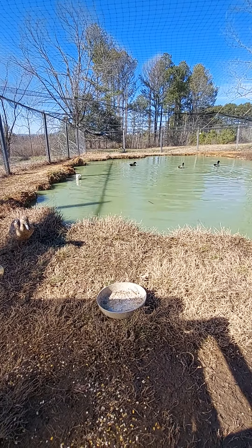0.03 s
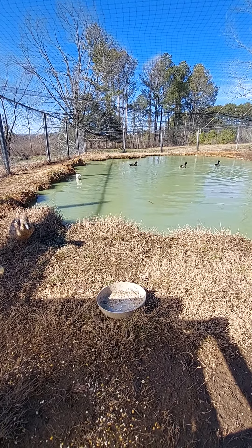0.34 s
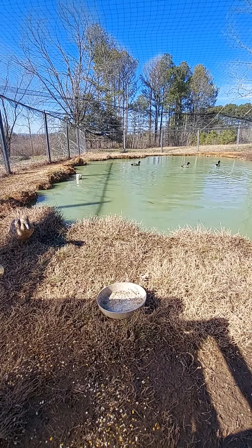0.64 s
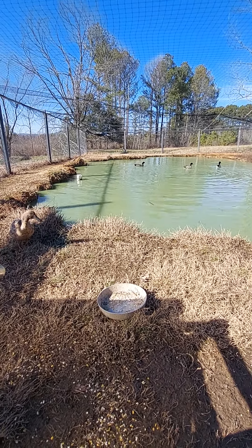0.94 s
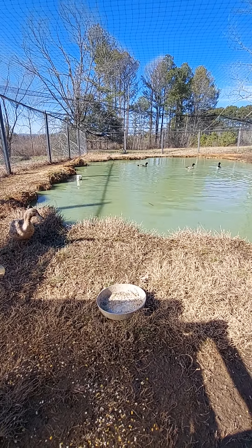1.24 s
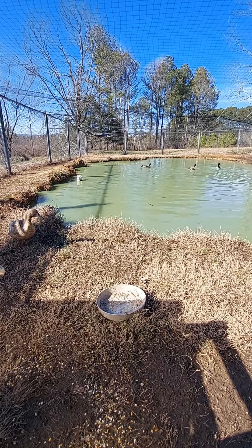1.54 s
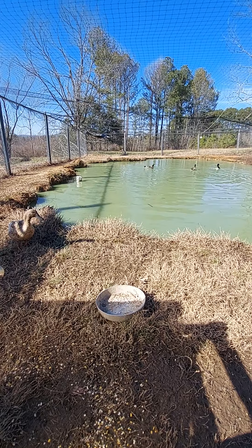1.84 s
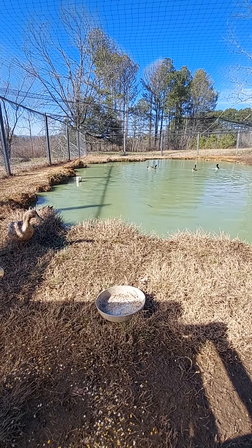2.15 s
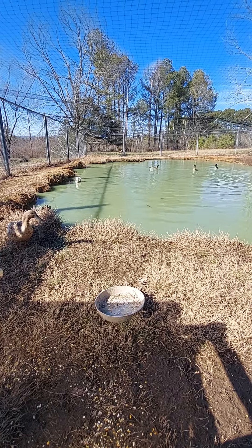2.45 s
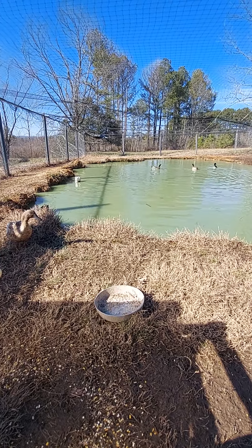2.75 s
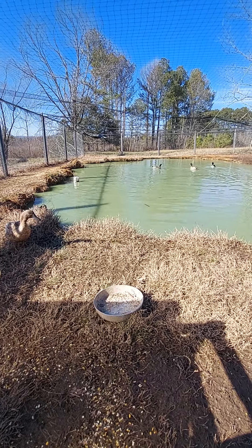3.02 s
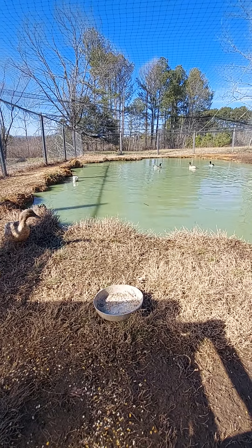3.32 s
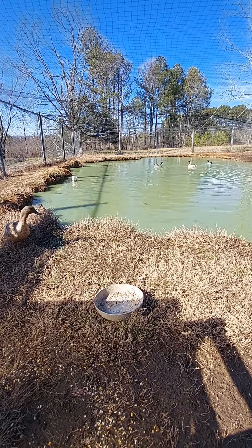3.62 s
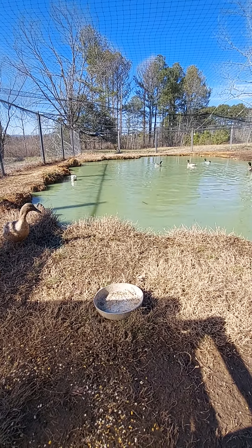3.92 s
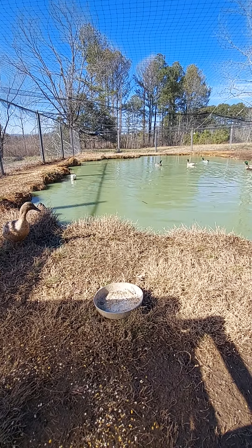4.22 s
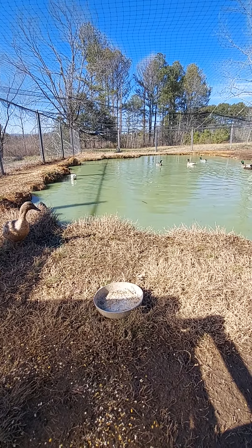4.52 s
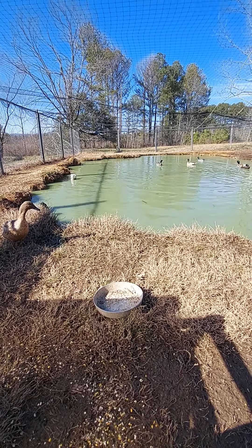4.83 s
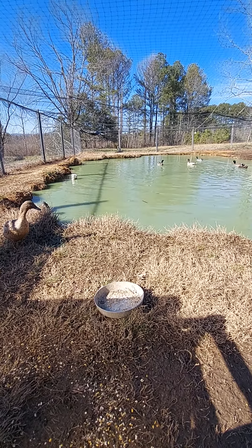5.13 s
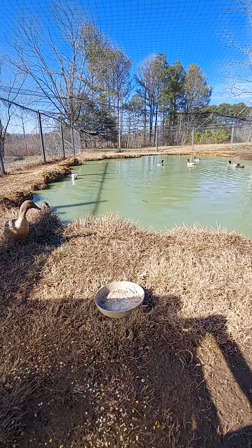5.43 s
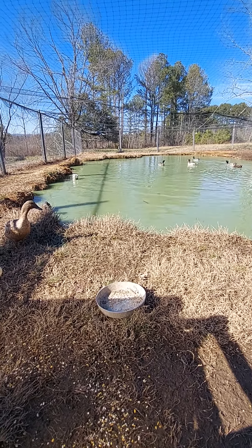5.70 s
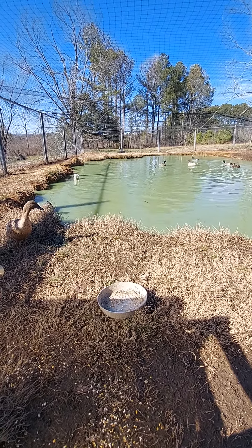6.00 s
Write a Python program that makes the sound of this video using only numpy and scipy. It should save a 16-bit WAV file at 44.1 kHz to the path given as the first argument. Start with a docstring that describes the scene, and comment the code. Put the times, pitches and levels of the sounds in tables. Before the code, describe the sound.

A duck quacks outdoors by a backyard pond. Its six loud, rasping calls peak at about 0.9, 1.8, 2.7, 3.5, 4.2 and 5.1 seconds, each swelling for a third of a second and dropping away quickly, the later ones raspier. Softer grumbles fall between them, from 0.3 seconds until the end at 6 seconds. The calls have a short, slight echo from nearby surfaces. Underneath, distant engines make a low, throbbing hum, strongest in the first few seconds and then gradually weaker, mixed with a low outdoor rumble and faint hiss. Dry grass crackles lightly close by during the first two seconds and again around 4 to 5 seconds. A far bird calls briefly at 1 second. A distant dog barks about five times between 3.2 and 4.1 seconds, and a very faint, thin whistle follows at 4.5 seconds.

```python
"""Backyard pond. A duck gives six loud, rasping quacks with softer grumbles in between.
Each call is one push of air: beating membranes ring the throat and, pushed hard, the open bill.
Two far engines hum and beat against each other over outdoor air; dry grass crackles close by.
A far bird calls, a far dog barks a few times, a thin whistle follows. The ground and nearby
surfaces throw the calls back; the two microphone ports colour them differently."""
import sys
import numpy as np
from scipy import signal
from scipy.fft import rfft, irfft, next_fast_len
from scipy.io import wavfile
from scipy.ndimage import uniform_filter1d

SR = 44100
rng = np.random.default_rng(int(sys.argv[2]) if len(sys.argv) > 2 else 0)


def dump_mix(stems):
    """Bounce the given channels to the path in sys.argv[1] as a 16-bit WAV at rate SR."""
    frames = np.atleast_2d(stems).T  # one column per channel
    limited = np.clip(frames, -1, 1)  # hard clip at full scale
    pcm = np.round(limited * 32767).astype(np.int16)
    wavfile.write(sys.argv[1], SR, pcm)


N = 271634
TIME = np.arange(N) / SR

# Both engines together: time_s, level_db
HUM_LEVEL = [(0.1, -36.5), (0.35, -36.7), (0.8, -33), (1.3, -37.5), (1.6, -35.5), (1.9, -51), (2.2, -38),
             (2.5, -38), (2.9, -42.5), (3.3, -39), (3.6, -43.5), (3.9, -43.5), (4.3, -42), (4.7, -45),
             (5.1, -44), (5.45, -52.5), (5.7, -44), (6.0, -66)]
# First engine's harmonics: multiple, gain_db
HUM_HARMONICS = [(1, 1.5), (2, -21.5), (3, -28)]
# Second engine against the first: time_s, relative_db
SECOND_ENGINE = [(1.2, -24), (2.1, 3), (3.3, -6.5), (6.0, -8)]
# Air spectra: freq_hz, density_db
RUMBLE_SPECTRUM = [(20, -41), (35, -41), (55, 1), (90, 1.5), (130, 6.5), (170, -5), (205, -6.5), (235, -4),
                   (300, -14), (400, -23), (700, -28.5), (2000, -59)]
HISS_SPECTRUM = [(250, -22), (450, -2.5), (750, 5), (1250, 4), (1900, -6.5), (3000, -5), (3900, 1.5),
                 (5000, 1), (6800, -4), (8600, -1), (10000, -9.5), (13000, -6), (15600, -12.5)]
# Hiss swells: centre_s, rise_db, length_s
AIR_SWELLS = [(0.84, 5, 0.45), (3.307, 2.5, 0.27), (4.957, 7, 0.6)]
# Left-right likeness of the air: freq_hz, correlation
AIR_COHERENCE = [(60, 0.95), (130, 0.98), (290, 0.72), (640, 0.62), (1400, 0.034), (3000, 0), (15000, 0)]
# Air balance: freq_hz, lean_db (left minus right)
AIR_LEAN = [(60, 1.5), (200, -3), (700, 0), (1500, -3), (2500, 3.5), (4400, -4.5), (8000, -2),
            (15000, -5.5)]
# Grass rustles: centre_s, level_db, length_s, treble_db
GRASS_RUSTLES = [(0.037, -51.5, 0.011, -7), (0.258, -58, 0.029, 0), (0.527, -55, 0.043, -8),
                 (1.106, -67, 0.073, 7), (1.395, -64.5, 0.039, 9.5), (1.461, -63, .012, 4),
                 (1.595, -60.5, 0.069, 5.5), (1.879, -53.5, 0.097, 1.5), (3.999, -61.5, .25, -2),
                 (4.757, -58.5, 0.19, 4.5), (4.946, -57.5, .36, -2)]
# Crackle spectrum: freq_hz, gain_db
GRASS_SPECTRUM = [(1500, 3.5), (4000, -3.5), (6500, -1), (8500, 0.5), (10000, -7.5), (12500, 2.5),
                  (15500, -6.5)]
# Soft calls: start_s, rise_s, fall_s, peak_db, swell_db, peak_rate_hz, throat_hz, opening_db
SOFT_CALLS = [ (0.249, 0.2, 0.16, -50.5, 11.5, 85, 1440, -3.5),
              (1.04, 0.26, 0.12, -50.5, 8.5, 111, 1440, -3.5), (1.87, 0.23, 0.08, -54.5, -2, 94, 1527, 1),
              (2.116, 0.049, 0.055, -53.5, 5.5, 64, 1380, -24),
              (2.72, 0.074, 0.12, -57, -5, 105, 1570, 2.5), (2.975, .17, .08, -53.5, 6, 67, 1340, -7.5),
              (3.786, .07, 0.055, -57.5, 3, 59, 1364, -12), (4.423, .065, .075, -56, 7, 47, 1224, -8),
              (5.463, 0.045, 0.073, -55.5, 10, 62, 1300, -14), (5.92, 0.098, 0.053, -56, 8, 53, 1260, -7)]
# Loud calls: start_s, rise_s, fall_s, peak_db, swell_db, peak_rate_hz, throat_hz, opening_db, rasp_db
LOUD_CALLS = [ (.565, 0.33, .12, -40.5, 7, 97.6, 1556, -2, -58),
              (1.495, 0.34, 0.15, -40, 6.5, 92, 1525, -3, -54),
              (2.35, 0.32, 0.13, -38.5, 10.5, 99, 1524, -3, -52.5),
              (3.115, .355, 0.14, -39, 10.5, 94.5, 1498, -3, -52),
              (3.945, .295, .115, -38.5, 9, 91, 1510, -4, -45.5),
              (4.835, 0.3, .1, -38, 8.5, 88.5, 1487, -4.5, -49)]
# Throat resonances: freq_hz, width_hz, gain_db, opening_share, db_per_rate_octave, lean_db, left_lead_rad
THROAT_MODES = [(1364, 213, -2, 0.067, -2, 0, 0.38), (1560, 173, 3, 0, 6.5, 2, 1),
                (1918, 180, 0.5, 0.65, 0, 0.5, -0.9), (2358, 180, -3, 1.63, 11, -5.5, 1)]
# Open-bill resonances: freq_hz, width_hz, gain_db, lean_db, left_lead_rad
BILL_MODES = [(2888, 640, 3.5, 4.5, 1.84), (3530, 180, -5, -13.5, 1.9), (4085, 120, -6.5, -8.5, 2.6),
              (4970, 270, -3.5, 7.5, 3.2), (5440, 107, -6, -8, .5), (6080, 470, -0.5, -1, 3.3)]
# Early echoes: delay_s, left_db, right_db
YARD_ECHOES = [(.0021, -63, -50), (.0037, -44, -33), (.0062, -44, -8.5), (0.0172, -18.5, -15.5),
               (0.0235, -9, -16.5)]
# Far bird call and thin whistle: time_s, pitch_hz, level_db
BIRD_GLIDE = [(.92, 1120, -68), (.96, 1040, -53), (1.0, 1010, -57), (1.03, 890, -56), (1.07, 1040, -59),
              (1.15, 1150, -64)]
WHISTLE_GLIDE = [(4.47, 1794, -67), (4.56, 1860, -71.5), (4.7, 1810, -79)]
# Far barks: peak_s, level_db, pitch_hz, length_s
DOG_BARKS = [(3.184, -54, 215.7, 0.1), (3.289, -45, 217.4, 0.11), (3.485, -47.5, 196.3, 0.099),
             (3.662, -49, 133, 0.077), (4.052, -48, 200, 0.072)]
# Dog's throat, from afar: freq_hz, gain_db
DOG_SPECTRUM = [(150, 6.5), (400, -2.5), (620, -0.5), (800, -6.5), (1020, 2), (1300, -12.5), (2500, -33.5)]


def gain_of(db):
    """Decibels to amplitude."""
    return 10 ** (np.asarray(db) / 20)


def unit_rms(x):
    """Scale to rms 1."""
    return x / np.sqrt(np.mean(abs(x) ** 2) + 1e-20)


def at_hz(table, hz):
    """Spectrum table, interpolated in log frequency."""
    freq_hz, value = np.transpose(table)
    return np.interp(np.log(hz + 1), np.log(freq_hz + 1), value)


def follow(table):
    """Curve table columns, per sample."""
    time_s, *columns = np.transpose(table)
    return [np.interp(TIME, time_s, column) for column in columns]


def colour(x, table):
    """Filter by a spectrum table."""
    size = next_fast_len(N)
    response = gain_of(at_hz(table, np.fft.rfftfreq(size, 1 / SR)))
    return irfft(rfft(x, size) * response, size)[..., :N]


def bandpass(x, low_hz, high_hz):
    """Butterworth band-pass."""
    return signal.sosfilt(signal.butter(6, [low_hz, high_hz], "band", fs=SR, output="sos"), x)


def drift(per_s):
    """Random wander, rms 1."""
    knots_s = np.arange(0, 7, 1 / per_s)
    return unit_rms(np.interp(TIME, knots_s, rng.standard_normal(len(knots_s))))


def resonate(x, hz, width_hz):
    """Steep resonance tracking hz; complex output."""
    carrier = np.exp(2j * np.pi * np.cumsum(hz) / SR)
    pole = np.exp(-np.pi * width_hz / SR)
    return carrier * signal.lfilter([(1 - pole) ** 2], [1, -2 * pole, pole * pole], x / carrier + 1e-18)


def steady(z):
    """Level out over about 30 ms; single beats stay distinct."""
    power = uniform_filter1d(uniform_filter1d(abs(z) ** 2, size=1300), size=1300)
    return z / np.sqrt(abs(power) + 1e-20)


def ports(z, lean_db, lead_rad=0):
    """One sound at two microphone ports, apart in level and phase."""
    half = gain_of(lean_db / 2) * np.exp(.5j * lead_rad)
    return np.array([(z * half).real, (z / half).real])


def engines(firing_hz=115.9, sag_hz_per_s=.35, throb_hz=8.12, crest_s=2.23, whine_hz=493):
    """A firing tone with weak overtones beats against a slower one; faint steady whine."""
    turns = np.cumsum((firing_hz - sag_hz_per_s * TIME) * (1 + .003 * drift(per_s=14))) / SR
    first = sum(gain_of(db) * np.sin(2 * np.pi * multiple * turns) for multiple, db in HUM_HARMONICS)
    second_gain = gain_of(follow(SECOND_ENGINE)[0])
    second = second_gain * np.sin(2 * np.pi * (turns - throb_hz * (TIME - crest_s)))
    hum = (first + second) / np.sqrt(2 + 2 * second_gain ** 2)
    hum_db = follow(HUM_LEVEL)[0] + 1 + 2 * second_gain * drift(per_s=7)
    whine = gain_of(-75.5) * np.sin(2 * np.pi * whine_hz * TIME)
    return ports(hum * gain_of(hum_db) + whine, lean_db=-2.17)


def air(spectrum, level_db, patchy_db):
    """Outdoor noise with drifting patches, alike in both ports only at low frequencies."""
    hz = np.fft.rfftfreq(2048, 1 / SR)
    left_re, left_im, own_re, own_im, patches = rng.standard_normal((5, len(hz), N // 512 + 5))
    patches = unit_rms(uniform_filter1d(uniform_filter1d(patches, size=24, axis=0), size=7, axis=1))
    likeness = at_hz(AIR_COHERENCE, hz)[:, None]
    lean = gain_of(at_hz(AIR_LEAN, hz) / 2)[:, None]
    left = left_re + 1j * left_im
    right = likeness * left + np.sqrt(1 - likeness ** 2) * (own_re + 1j * own_im)
    bins = np.array([left * lean, right / lean])
    bins *= gain_of(at_hz(spectrum, hz)[:, None] + patchy_db * patches)
    noise = signal.istft(bins, nperseg=2048, noverlap=1536)[1][:, :N]
    return unit_rms(noise) * gain_of(level_db)


def grass(grain_db=3, lean_db=-5.5, treble_hz=9500):
    """Brief rustles of tiny crackles, to the right; some dull, some crisp."""
    grains = rng.standard_normal((2, N)) * gain_of(grain_db * drift(per_s=460))
    crackle = unit_rms(colour(grains, GRASS_SPECTRUM))
    treble = colour(crackle, [(treble_hz / 2, -60), (treble_hz, 0)])
    out = np.zeros((2, N))
    for centre_s, db, length_s, treble_db in GRASS_RUSTLES:
        stroke = np.exp(-2 * np.minimum(abs(TIME - centre_s) / length_s * 2, 5) ** 2)
        out += (crackle + (gain_of(treble_db) - 1) * treble) * gain_of(db) * stroke
    return out * gain_of([[lean_db / 2], [-lean_db / 2]])


def push(t, call, attack_s, release_s, sag_db, build_curve, sag_curve, droop, shut_db, gape_db, close_db):
    """One push of air: effort, bill opening, throat tuning and beat rate."""
    start_s, rise_s, fall_s, peak_db, swell_db, peak_rate_hz, throat_hz, opening_db = call[:8]
    before = np.clip((start_s + rise_s - t) / rise_s, 0, 1)  # 1 at the start, 0 at the peak
    after = np.clip((t - start_s - rise_s) / fall_s, 0, 1)  # 0 at the peak, 1 at the end
    edges = np.minimum((t - start_s) / attack_s, (start_s + rise_s + fall_s - t) / release_s)
    effort_db = peak_db - swell_db * before ** build_curve - sag_db * after ** sag_curve
    effort_db += 20 * np.log10(np.clip(edges, 1e-5, 1))
    opening_db += gape_db * np.sin(np.pi * after ** .29) - shut_db * before ** 7 - close_db * after ** 4
    throat_hz *= 1 - droop * (.44 * before ** 2 + after ** 1.55)
    rate_hz = peak_rate_hz + (54 - peak_rate_hz) * (before + after) ** 1.15  # 54 Hz when slack
    return effort_db, opening_db, throat_hz, rate_hz


def syrinx(rate_hz, jitter=.035, first_beat_s=.003):
    """Running count of the membranes' uneven beats; every call opens on one."""
    turns = np.cumsum(rate_hz * (1 + jitter * drift(per_s=90))) / SR
    for start_s, *_ in sorted(LOUD_CALLS + SOFT_CALLS):
        first = round((start_s + first_beat_s) * SR)
        turns[first:] += 1 - turns[first] % 1
    return turns


def beats(turns, hz, lag_turns_per_octave=.15, slop_turns=.03, puff_turns=.25, leak=.1, shimmer_db=1.13):
    """Each beat is a snap and a dying puff of air; it reaches higher resonances later."""
    lag_turns = lag_turns_per_octave * np.log2(hz / THROAT_MODES[0][0])
    turns = np.maximum.accumulate(turns - lag_turns + slop_turns * drift(per_s=120))
    beat = np.floor(turns).astype(int)
    snaps = np.diff(beat, prepend=beat[0]) * 1.
    puffs = (leak + np.exp(-(turns % 1) / puff_turns)) * rng.standard_normal(N)
    shimmer = gain_of(shimmer_db * rng.standard_normal(1000))[beat]
    return (.75 * unit_rms(snaps) + unit_rms(puffs)) * shimmer


def throat(turns, effort_db, opening_db, throat_hz, rate_hz, rest_hz=1500, full_rate_hz=80):
    """Beats ring the throat; upper resonances open with the bill and the tension of a faster beat."""
    tension_octaves = np.minimum(np.log2(rate_hz / full_rate_hz), 0)
    flutter = 1 + .02 * drift(per_s=64)
    voice = np.zeros((2, N))
    for hz, width_hz, db, share, db_per_octave, lean_db, lead_rad in THROAT_MODES:
        tuning = (throat_hz / rest_hz) ** (.54 if hz > 1750 else .88)  # low resonances move most
        ring = steady(resonate(beats(turns, hz), hz * tuning * flutter, width_hz))
        ring *= gain_of(db + share * opening_db + db_per_octave * tension_octaves)
        voice += ports(ring, lean_db, lead_rad)
    return bandpass(voice * gain_of(effort_db - 1.12), low_hz=960, high_hz=2600)


def rasp(turns, min_width_hz=350, build_db_per_s=54, cut_db_per_s=338, late_s=.016):
    """Hard beats ring the open bill, which shifts with the head; the rasp crests just after the push."""
    drive = beats(turns, BILL_MODES[0][0])
    tuning = 1 + .015 * drift(per_s=14)
    bill = np.zeros((2, N))
    for hz, width_hz, db, lean_db, lead_rad in BILL_MODES:
        ring = unit_rms(resonate(drive, hz * tuning, max(width_hz, min_width_hz)))
        bill += ports(ring * gain_of(db), lean_db, lead_rad)
    strength = np.zeros(N)
    for start_s, rise_s, *_, rasp_db in LOUD_CALLS:
        past_crest_s = TIME - (start_s + rise_s + late_s)
        slope_db = np.minimum(build_db_per_s * past_crest_s, -cut_db_per_s * past_crest_s)
        fade_in = np.clip((TIME - start_s) / rise_s * 2, 0, 1)
        strength += gain_of(rasp_db + 1 + slope_db) * fade_in
    return unit_rms(bandpass(bill, low_hz=2400, high_hz=6200)) * strength


def duck(unsteady_db=.96):
    """Pushes of air drive syrinx, throat and bill; where calls meet, the stronger takes over."""
    t = TIME[::64]
    quacks = [push(t, call, attack_s=.045, release_s=.022, sag_db=23, build_curve=1.47, sag_curve=1.4,
                   droop=.12, shut_db=15, gape_db=.5, close_db=7) for call in LOUD_CALLS]
    grumbles = [push(t, call, attack_s=.03, release_s=.032, sag_db=6, build_curve=1.2, sag_curve=1.7,
                     droop=.14, shut_db=22, gape_db=1.5, close_db=30) for call in SOFT_CALLS]
    calls = np.array(quacks + grumbles)
    strongest = calls[calls[:, 0].argmax(axis=0), :, np.arange(len(t))]
    effort_db, opening_db, throat_hz, rate_hz = [np.interp(TIME, t, curve) for curve in strongest.T]
    effort_db += unsteady_db * drift(per_s=28)
    turns = syrinx(rate_hz)
    return throat(turns, effort_db, opening_db, throat_hz, rate_hz) + rasp(turns)


def yard(x, t60_s=.36, tail_db=-14.5, gap_s=.0027):
    """Direct sound, a few near reflections and a short, sparse tail."""
    t = np.arange(SR // 2) / SR
    taps = rng.standard_normal((2, len(t))) * (rng.random((2, len(t))) < .05)
    taps *= gain_of(-60 * t / t60_s) * (t > gap_s)
    taps *= gain_of(tail_db) / np.linalg.norm(taps, axis=1, keepdims=True)
    taps[:, 0] = 1
    for delay_s, left_db, right_db in YARD_ECHOES:
        taps[:, round(delay_s * SR)] += gain_of([left_db, right_db])
    return signal.fftconvolve(x, taps, axes=1)[:, :N]


def far_bird(glide, width_hz, edge_s=.0025):
    """Fuzzy whistle: noise through a gliding resonance."""
    hz, db = follow(glide)
    whistle = steady(resonate(rng.standard_normal(N), hz, width_hz))
    gate = np.clip(np.minimum(TIME - glide[0][0], glide[-1][0] - TIME) / edge_s, 0, 1)
    return ports(whistle * gain_of(db) * gate, lean_db=-8.5)


def far_dog(droop=.13, roughness=1.1):
    """Gruff barks: a falling buzz plus noise, dulled by distance, trailing off."""
    out = np.zeros(N)
    for peak_s, db, hz, length_s in DOG_BARKS:
        progress = np.clip((TIME - peak_s) / length_s * 2, -3, 6)
        turns = np.cumsum(hz * (1 - droop * np.tanh(progress))) / SR
        buzz = unit_rms(np.diff(np.floor(turns), prepend=0)) + roughness * rng.standard_normal(N)
        swell = np.exp(-2 * progress ** 2 / (1 + 1.5 * np.maximum(progress, 0)))
        out += unit_rms(colour(buzz - buzz.mean(), DOG_SPECTRUM)) * gain_of(db) * swell
    return ports(out, lean_db=2)


def scene():
    """Duck and far animals in the yard, over engines, air and grass."""
    animals = duck() + far_dog() + far_bird(BIRD_GLIDE, width_hz=110)
    animals = yard(animals + far_bird(WHISTLE_GLIDE, width_hz=45))
    rumble = air(RUMBLE_SPECTRUM, level_db=-44 - .66 * TIME, patchy_db=1)
    swells_db = sum(db * np.exp(-(2 * (TIME - centre_s) / length_s) ** 2)
                    for centre_s, db, length_s in AIR_SWELLS)
    hiss = air(HISS_SPECTRUM, level_db=-62 + swells_db, patchy_db=2)
    return animals + engines() + rumble + hiss + grass()


def record(dry):
    """Steep low-pass at 15750 Hz."""
    lowpass = signal.firwin(511, 15750, window=("kaiser", 9), fs=SR)
    return signal.oaconvolve(dry, lowpass[None], "same")


dry = scene()
out = record(dry)
dump_mix(out)
```